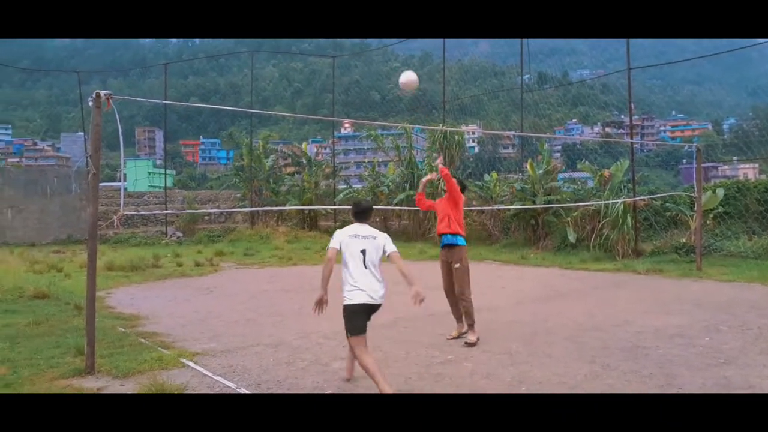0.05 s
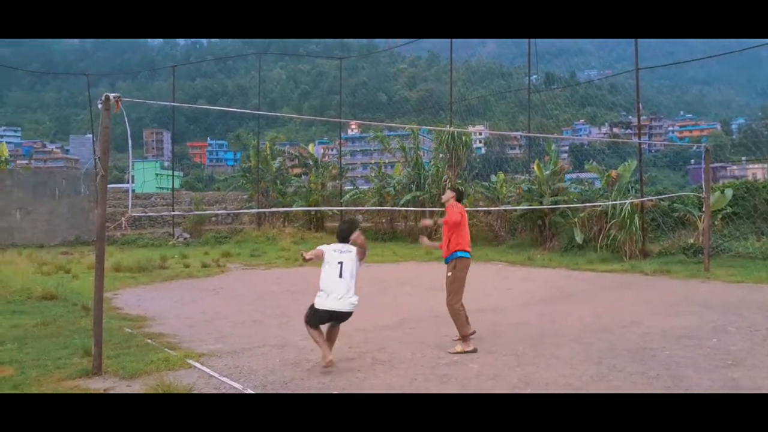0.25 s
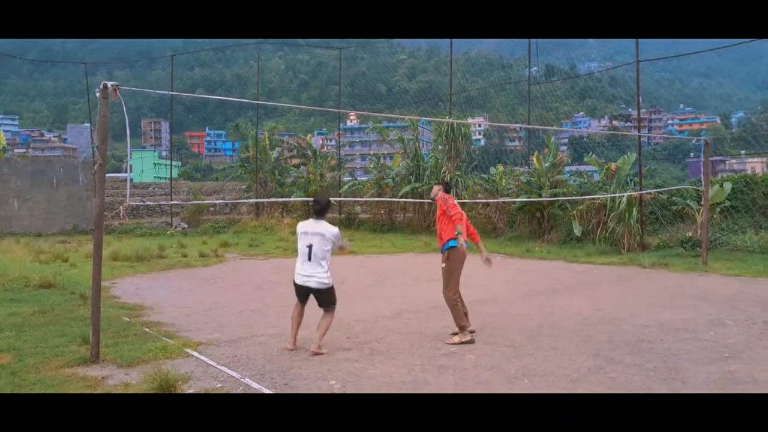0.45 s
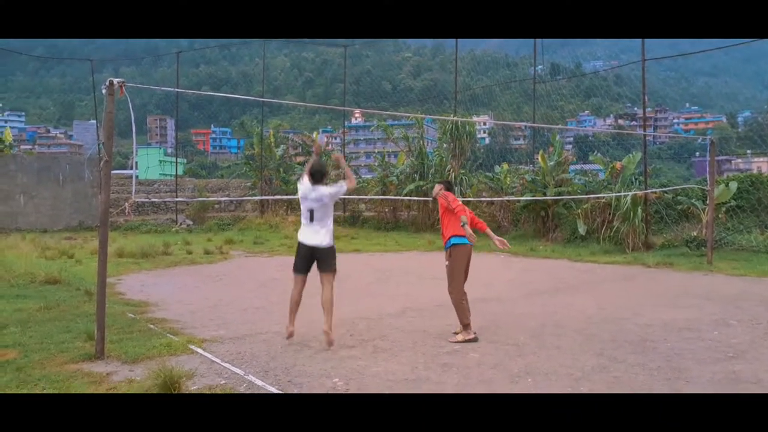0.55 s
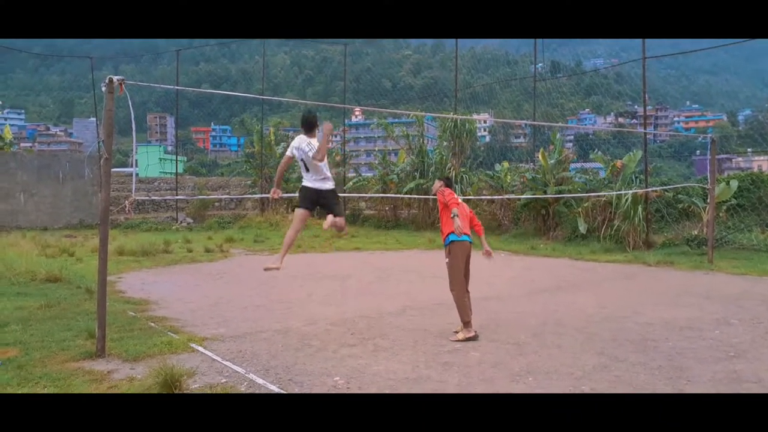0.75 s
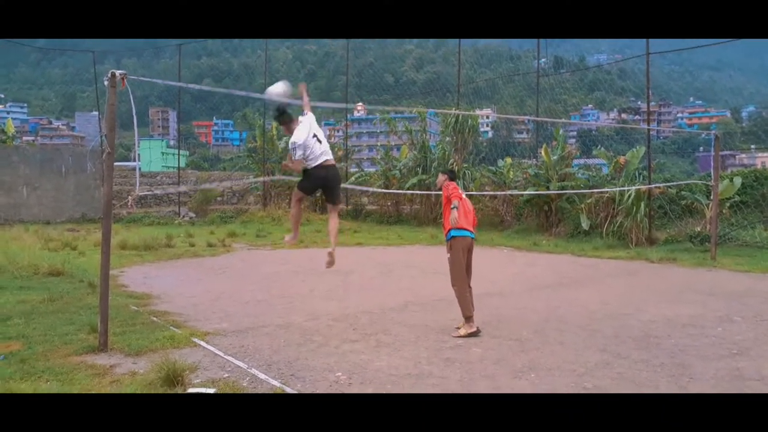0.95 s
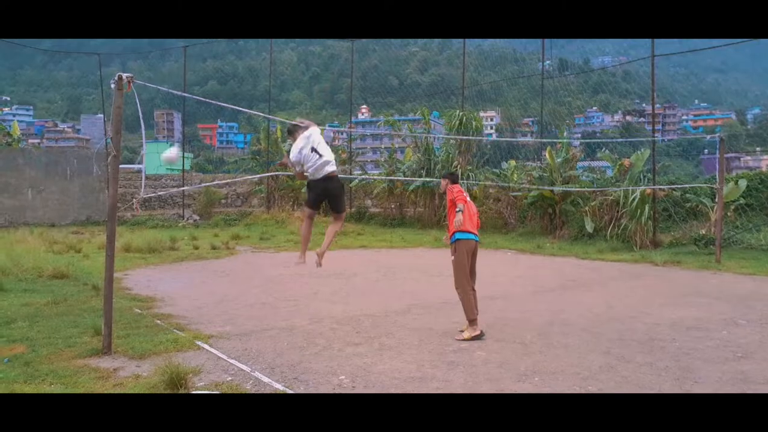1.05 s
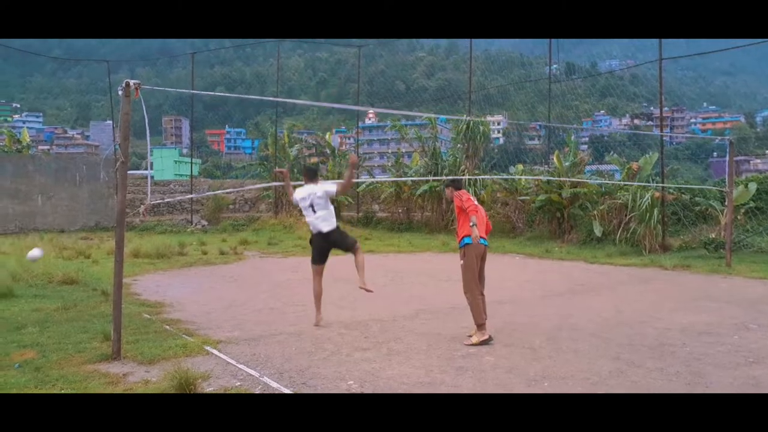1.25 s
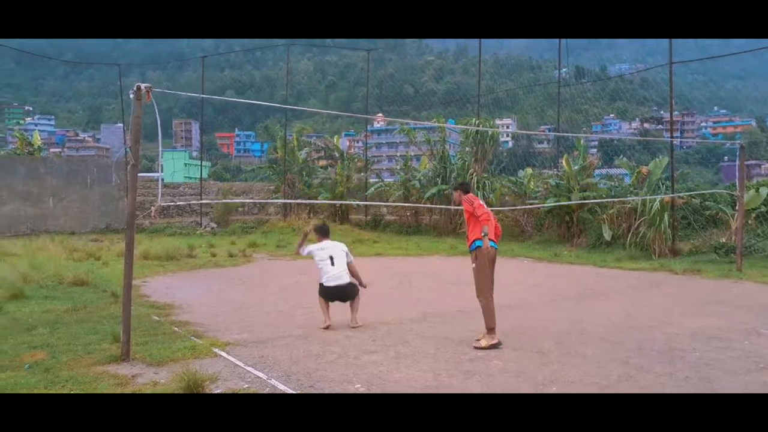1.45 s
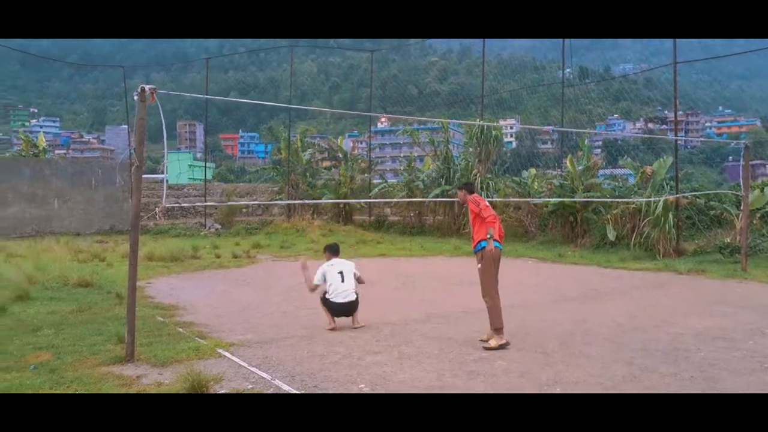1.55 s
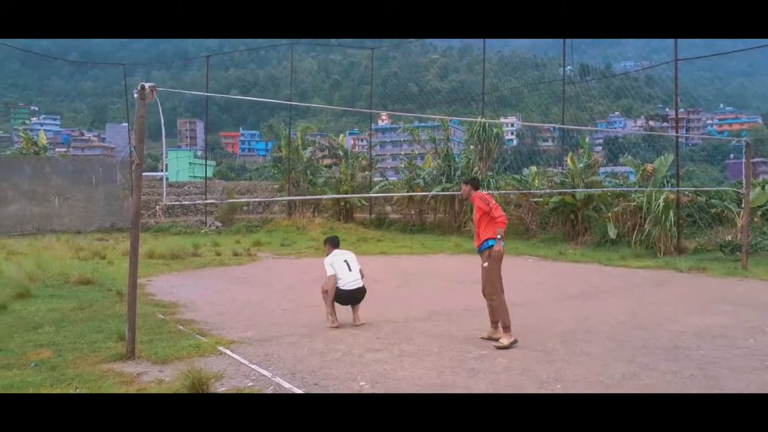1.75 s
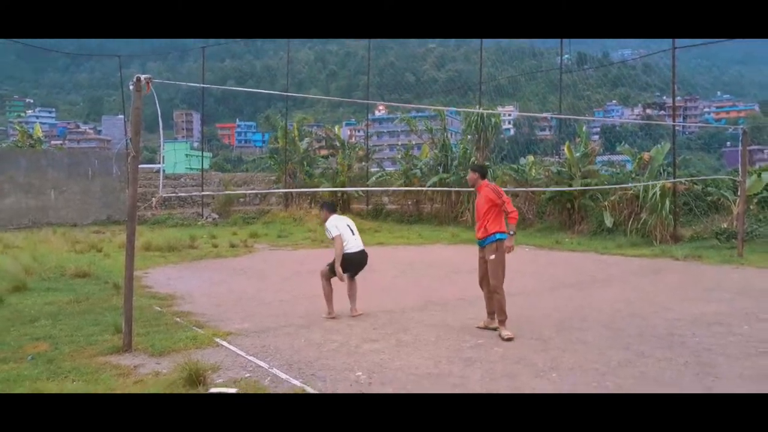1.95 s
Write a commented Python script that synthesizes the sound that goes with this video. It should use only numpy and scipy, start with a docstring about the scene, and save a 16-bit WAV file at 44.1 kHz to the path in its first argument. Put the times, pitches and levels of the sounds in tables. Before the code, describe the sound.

One sharp volleyball spike, with bare feet thudding and scuffing outdoors in light wind.

```python
"""Volleyball spike on a dirt court

Under a low, lumpy wind and the far hiss of open air, bare feet skid, thud and scuff on the ground.
A hand cracks on the ball and sets its skin ringing; the squashed ball gives a deep thump and a short
hollow ring, then lands farther off with a gritty pock."""
import sys
import numpy as np
from scipy import signal
from scipy.io import wavfile

SR = 44100
rng = np.random.default_rng(int(sys.argv[2]) if len(sys.argv) > 2 else 0)


def output_pcm(signal):
    """Save a mono or channel-first signal as 16-bit PCM at the path in sys.argv[1].

    Samples are clipped to [-1, 1] before scaling.
    """
    pcm = np.clip(np.atleast_2d(signal).T, -1, 1) * 32767
    wavfile.write(sys.argv[1], SR, np.round(pcm).astype(np.int16))


N = 88200
T = np.arange(N) / SR

# spectrum of sliding grit, also the colour of the slap's tail: f/Hz, level/dB
GRIT_COLOUR = [(300, 3), (800, -1.5), (1400, -5.5), (2300, -6), (3200, -8.5), (5000, -11.5), (9000, -16.5),
               (15000, -22)]


def from_db(db):
    """Decibels to gain."""
    return 10 ** (np.asarray(db) / 20)


def rms_one(x):
    """Scale to unit power."""
    return x / np.sqrt(np.mean(x ** 2) + 1e-20)


def at_hz(points, hz):
    """Read a curve on a log-frequency axis."""
    f, value = np.transpose(points)
    return np.interp(np.log(hz), np.log(f), value)


def fader(points):
    """Gain riding a level curve."""
    return from_db(np.interp(T, *np.transpose(points)))


def pan(right_db):
    """Left and right gains, the right louder by right_db."""
    return from_db(np.array([[-.5], [.5]]) * right_db)


def drift(rate_hz):
    """Random wander of unit power."""
    knots = rng.standard_normal(256)
    return rms_one(np.interp(T * rate_hz, np.arange(len(knots)), knots))


def envelope(start, attack, hold, t60):
    """Straight rise, hold, exponential release; times in seconds."""
    age = T - start
    release = np.exp(-np.log(1000) * np.clip((age - attack - hold) / t60, 0, 10))
    return np.clip(age / attack, 0, 1) * release


def strokes(rows):
    """Summed envelopes of sliding contacts."""
    return sum(from_db(db) * envelope(start, attack, hold, t60) for start, db, attack, hold, t60 in rows)


def tone(start, hz, glide=0, lead=0):
    """A sine passing through hz at the start time, gliding in Hz/s."""
    age = T - start + lead
    return np.sin(2 * np.pi * age * (hz + .5 * glide * age))


def struck(start, modes, attack):
    """Modes struck together, each dying away at its own rate."""
    return sum(from_db(db) * envelope(start, attack, 0, t60) * tone(start, hz) for hz, db, t60 in modes)


def noise(colour, flicker_db=0):
    """Stereo noise in narrow bands, each with its own level, flicker, width and pan."""
    # likeness of left and right: f/Hz, correlation
    likeness = [(60, 0.94), (130, 1), (290, .86), (640, 0.44), (1400, -0.47), (3100, 0.054),
                (7000, -0.0063), (15000, -0.036)]
    # lean to the right: f/Hz, right over left/dB
    lean = [(60, 4), (700, 3.5), (1300, 6), (2400, 6.5), (4400, 9.5), (8000, 5), (15000, 9.5)]
    edges = np.geomspace(36, 17000, 29)
    white, out = rng.standard_normal((2, 2, N)), 0
    for k, band in enumerate(zip(edges, edges[1:])):
        mid, side = signal.sosfilt(signal.butter(3, band, "band", fs=SR, output="sos"), white[k % 2])
        hz = np.sqrt(band[0] * band[1])
        alike = np.clip(at_hz(likeness, hz), -1, 1)
        gain = from_db(at_hz(colour, hz) + flicker_db * drift(rate_hz=25.01)) * pan(at_hz(lean, hz))
        out = out + gain * (np.sqrt(1 + alike) * mid + np.sqrt(1 - alike) * side * [[1], [-1]])
    return rms_one(out)


def air():
    """A bed of lumpy low wind under a smooth far hiss."""
    # swells of the wind's rumble: t/s, level/dB
    wind_swells = [(.2, -32), (.27, -28), (.37, -26.5), (.42, -28), (.7, -30), (1.0, -28), (1.18, -27.5),
                   (1.27, -32), (1.42, -31.5), (1.6, -32.5), (1.69, -31), (1.79, -33), (2, -32.5)]
    # spectrum of the rumble: f/Hz, level/dB
    wind_colour = [(30, -32), (45, -11), (65, -5.5), (130, 0), (185, 1), (250, -7.5), (325, -4), (430, -12),
                   (700, -16), (1200, -27), (2500, -45)]
    # near-steady course of the hiss: t/s, level/dB
    hiss_levels = [(.2, -40.5), (.4, -40), (1.1, -40.5), (1.3, -40.5), (2, -41)]
    # spectrum of the hiss: f/Hz, level/dB
    hiss_colour = [(400, -9), (800, -1.5), (1500, 2), (2500, -4.5), (4500, -9.5), (7000, -11.5),
                   (8300, -21), (12000, -19), (15500, -28.5)]
    rumble = fader(wind_swells) * noise(wind_colour, flicker_db=2.26)
    hiss = fader(hiss_levels) * noise(hiss_colour, flicker_db=.83)
    return rumble + hiss


def sole_skid():
    """A sole skids in the run-up, brighter than the other scuffs."""
    # spectrum of the skid: f/Hz, level/dB
    colour = [(500, 3), (1500, -10), (3000, 3), (4800, -2), (8500, -15), (14000, -12)]
    return from_db(-38.5) * envelope(.25, attack=.0044, hold=.019, t60=.077) * noise(colour)


def ground_thuds():
    """Dull blows on packed earth, each a low tone with one softer overtone."""
    # thuds on the ground: t/s, level/dB, f/Hz, t60/s
    thuds = [(.255, -27, 70.6, 0.11), (.318, -21.5, 175.5, 0.13), (.336, -19, 166, 0.13),
             (0.451, -27, 66.5, 0.22), (0.726, -25, 133, .08), (.854, -20, 131, 0.068),
             (0.921, -26.5, 170, 0.068), (1.286, -19.5, 137, 0.038), (1.431, -23, 86.4, 0.14),
             (1.526, -21.5, 126, 0.038), (1.636, -27.5, 164, 0.069), (1.678, -24, 136.6, 0.19)]
    out = 0
    for start, db, hz, t60 in thuds:
        body = tone(start, hz) + from_db(-5.5) * tone(start, 2.2 * hz)
        out = out + from_db(db) * envelope(start, attack=.0034, hold=0, t60=t60) * body
    return out * pan(right_db=4.5)


def grit_scuffs():
    """Feet and ball slide on grit in short, grainy bursts."""
    # slides: t/s, level/dB, attack/s, hold/s, t60/s
    scuffs = [(.44, -40, 0.018, .02, .1), (1.362, -42, 0.0092, 0.021, 0.11),
              (1.422, -36, 0.0079, 0.014, 0.063)]
    return strokes(scuffs) * noise(GRIT_COLOUR, flicker_db=-1.0)


def hand_slap():
    """Palm and fingers crack on the taut skin and roll off with a rasp; a faint echo and tail follow."""
    # contacts of the hand: t/s, level/dB, t60/s
    slaps = [(1.0171, -11, 0.0045), (1.0198, -19.5, 0.013), (1.0197, -15, 0.004)]
    # spectrum of the slap: f/Hz, level/dB
    colour = [(300, -5), (700, 1), (1300, 0), (2200, -10), (4600, -8), (7000, -9), (9000, -22),
              (12000, -11), (15500, -11.5)]
    # bright snap of the skin: f/Hz, level re the contact/dB, t60/s
    snap_modes = [(1380, -8.5, 0.0061), (12200, -12.5, 0.0044), (13600, -11, .004), (15000, -19, .003)]
    # the hand rolling off: t/s, level/dB, attack/s, hold/s, t60/s
    rasps = [(1.025, -30.5, 0.0019, 0.0053, .03), (1.0335, -31, 0.00078, 0.0012, .02)]
    crack = pressure_pulse = snap = 0
    for start, db, t60 in slaps:
        crack += from_db(db) * envelope(start, attack=.0001, hold=.0004, t60=t60)
        pressure_pulse += from_db(db + 1.5) * envelope(start, attack=.0001, hold=.00031, t60=.0011)
        snap += from_db(db) * struck(start, snap_modes, attack=.0001)
    hit_s, hit_db, _ = slaps[0]
    # the slap comes back, smeared, from the edge of the court
    echo = from_db(hit_db - 33) * envelope(hit_s + .057, attack=.0033, hold=.008, t60=.076)
    tail = from_db(-32.5) * envelope(hit_s, attack=.013, hold=0, t60=.32) * noise(GRIT_COLOUR)
    smack = (crack + strokes(rasps) + echo) * noise(colour)
    return smack + (snap - pressure_pulse) * pan(right_db=4.5) + tail


def ball_skin():
    """The struck skin rings, then squeaks as the hand leaves it."""
    # modes of the skin: f/Hz, level/dB, t60/s
    modes = [(1050, -25.5, 0.045), (1405, -25.5, 0.037), (1740, -25, 0.026), (2856, -24, 0.019),
             (3980, -29, 0.05), (4370, -27, .025), (4670, -24, .03), (6500, -27, .02), (7240, -30.5, 0.023),
             (11680, -35, .015)]
    hit_s, squeak_s = 1.0171, 1.031
    ring = struck(hit_s, modes, attack=.0001)
    squeak_gain = from_db(-28.5) * envelope(squeak_s, attack=.0032, hold=.0016, t60=.012)
    return (ring + squeak_gain * tone(squeak_s, hz=4110)) * pan(right_db=8)


def hollow_ring():
    """The ball sounds a few hollow cycles at each change of shape."""
    # blow, rebound, first touch and landing: t/s, level/dB, f/Hz, glide/(Hz/s), attack/s, hold/s, t60/s
    rings = [(1.01715, -12.5, 674, 0, 0.00028, 0.003, 0.018),
             (1.033, -13, 716, 10997, 0.00083, 0.0035, 0.033), (1.4314, -24, 625, 0, 0.0021, 0.0017, 0.018),
             (1.4398, -13.5, 681, -11000, .0025, 0.0029, 0.011)]
    lead_s = .00015 * np.array([[.5], [-.5]])  # left just ahead of right
    out = 0
    for start, db, hz, glide, attack, hold, t60 in rings:
        out = out - from_db(db) * envelope(start, attack, hold, t60) * tone(start, hz, glide, lead_s)
    return out * pan(right_db=4)


def ball_thump():
    """The ball is squashed and springs back: a deep thump that sags in pitch."""
    squash_s = 1.0192
    gain = from_db(-10) * envelope(squash_s, attack=.0026, hold=.0078, t60=.032)
    return gain * tone(squash_s, hz=95, glide=-700) * pan(right_db=4)


def landing_knock():
    """The ball's skin meets packed earth with a woody knock."""
    # modes of the knock: f/Hz, level/dB, t60/s
    modes = [(302, -21.5, .04), (787, -22.5, 0.046), (1050, -35, 0.014), (1810, -38, .03),
             (2350, -33.5, 0.039)]
    return struck(1.4405, modes, attack=.0025) * pan(right_db=4.5)


def scene():
    """The spike and the sounds on the ground, mixed over the open air."""
    spike = hand_slap() + ball_skin() + hollow_ring() + ball_thump()
    ground = sole_skid() + ground_thuds() + grit_scuffs() + landing_knock()
    return spike + ground + air()


def record(dry):
    """Silent until the sound cuts in; the deepest rumble and the top are cut, the peaks rounded."""
    start_s, low_cut_hz, high_cut_hz, ceiling = .198, 44, 15600, .85
    thinned = signal.sosfilt(signal.butter(4, low_cut_hz, "high", fs=SR, output="sos"), dry)
    rounded = thinned / (1 + (thinned / ceiling) ** 6) ** (1 / 6)
    cut_in = np.clip((T - start_s) / .001, 0, 1)
    return signal.sosfilt(signal.ellip(10, .2, 80, high_cut_hz, fs=SR, output="sos"), cut_in * rounded)


dry = scene()
out = record(dry)
output_pcm(out)
```